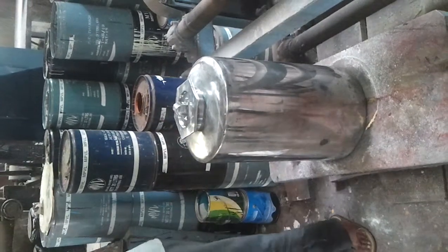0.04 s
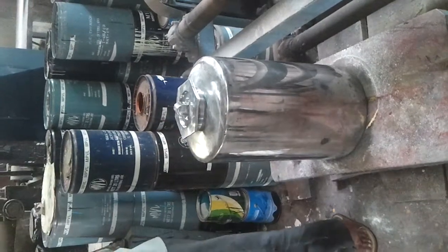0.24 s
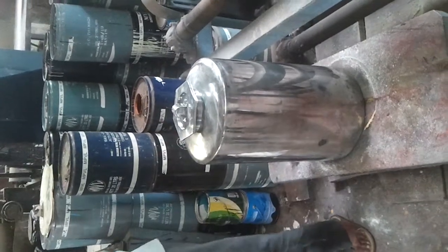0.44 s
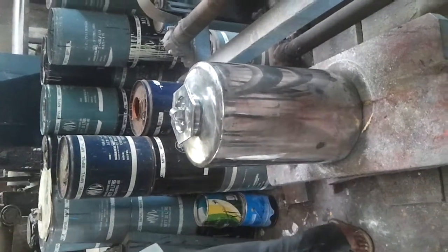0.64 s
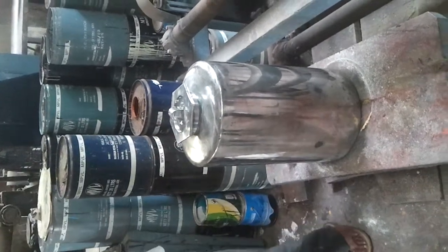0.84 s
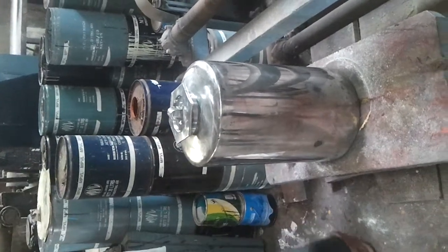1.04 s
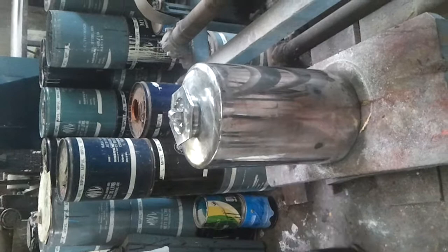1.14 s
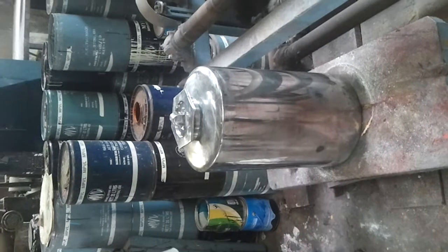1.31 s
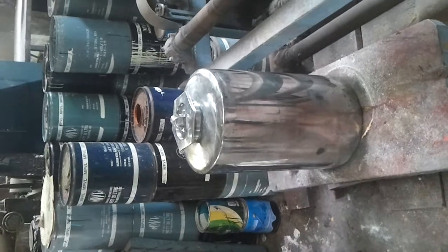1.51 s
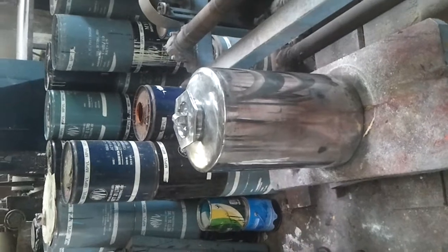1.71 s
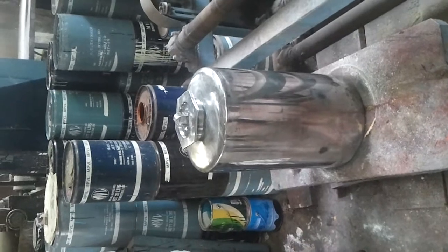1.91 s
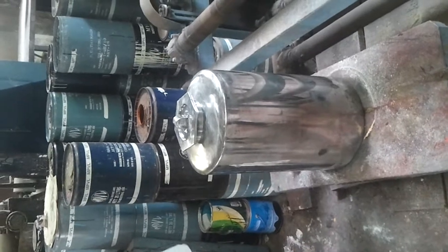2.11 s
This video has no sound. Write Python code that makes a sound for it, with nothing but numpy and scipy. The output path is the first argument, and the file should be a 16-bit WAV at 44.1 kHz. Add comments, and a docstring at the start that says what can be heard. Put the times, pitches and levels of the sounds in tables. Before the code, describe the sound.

A tall steel can is set down with a loud clatter of clangs, high ringing and low booms, slightly overloading a close microphone. The ring fades through a workshop hall, leaving steady hiss, machine hum and soft handling scuffs.

```python
"""A workshop hall, one microphone close to the floor. A tall steel can is set down with a clatter
right beside it: the rim and lid ring high, the thin wall clangs, the base and the air inside boom.
The blows overload the microphone and fill the hall. Behind the can are a steady hiss, a throbbing
machine hum, a fading thud and a few soft scuffs, bumps and ticks of handling."""
import sys
import numpy as np
from scipy import signal
from scipy.fft import rfft, irfft
from scipy.io import wavfile

SR = 44100
rng = np.random.default_rng(int(sys.argv[2]) if len(sys.argv) > 2 else 0)


def file_out(sig):
    """Save sig as 16-bit WAV at sys.argv[1]."""
    # one column per channel
    cols = np.atleast_2d(sig).T
    # limit, then scale
    lim = np.clip(cols, -1, 1)
    pcm = np.round(lim * 32767).astype(np.int16)
    wavfile.write(sys.argv[1], SR, pcm)


N = 94815
T = np.arange(N) / SR

# Reverberation time of the hall: frequency_hz, t60_s
HALL_DECAY = [(80, 1.33), (300, 2.27), (1000, 1.86), (2500, 1.4), (5000, 1.82), (10000, 1.15)]
HALL_RISE_S = 0.14


def undb(db):
    """Decibels to gain."""
    return 10 ** (np.asarray(db) / 20)


def along(points, hz):
    """Read a table on a log-frequency axis."""
    frequencies, values = np.array(points, float).T
    return np.interp(np.log(np.maximum(hz, 1)), np.log(frequencies), values)


def colour(x, spectrum):
    """Filter by a table of frequency_hz, gain_db."""
    return irfft(rfft(x) * undb(along(spectrum, np.fft.rfftfreq(N, 1 / SR))), N)


def noise(spectrum):
    """Coloured noise of rms 1."""
    x = colour(rng.standard_normal(N), spectrum)
    return x / x.std()


def drift(rate_hz):
    """Smooth random motion of spread 1, mostly slower than rate_hz."""
    count = N // 32
    lowpass = np.exp(-(np.fft.rfftfreq(count, T[-1] / count) / rate_hz) ** 2)
    x = irfft(rfft(rng.standard_normal(count)) * lowpass, count)
    return np.interp(T, np.linspace(0, T[-1], count), x / x.std())


def ringing(hits, t60_s, rise_s=0.00031):
    """Envelope of a body that stores the energy of each hit (start_s, level_db) and steadily loses it."""
    kicks = np.zeros(N)
    for start_s, level_db in hits:
        kicks[max(int(start_s * SR), 0)] += undb(level_db) ** 2
    keep = np.exp(-2 * np.log(1000) / (t60_s * SR))
    fill = np.exp(-1 / (rise_s * SR))
    energy = signal.lfilter([keep * (1 - fill)], [1, -keep * (1 + fill), keep ** 2 * fill], kicks + 1e-18)
    return np.sqrt(abs(energy))


def swells(gestures):
    """Envelope of gestures that rise quickly and ebb slowly."""
    envelope = 0
    for start_s, length_s, level_db in gestures:
        progress = np.clip((T - start_s) / length_s, 0, 1)
        envelope += undb(level_db) * np.sin(np.pi * progress ** 0.61) ** 2
    return envelope


def room_tone():
    """The steady hiss of the workshop air."""
    spectrum = [(25, -1.5), (50, 3), (100, -5.5), (200, -11.5), (400, -11), (1000, -14), (2000, -15),
                (4000, -14), (7000, -17), (9500, -12.5), (10800, -19.5), (12500, -38), (15000, -92)]  # colour of the air: frequency_hz, gain_db
    level_db = -29 + 0.14 * drift(4.6)
    return undb(level_db) * noise(spectrum)


def machine_hum():
    """A machine in the background: one low tone that throbs and wavers in pitch."""
    throb = [(0, -26), (.79, -31), (.9, -29.5), (1.22, -33), (1.34, -36.5), (1.42, -28.5), (1.49, -44.5),
             (1.63, -36), (1.71, -29.5), (1.8, -33.5), (1.87, -28.5), (1.98, -32), (2.02, -37), (2.15, -37)]  # course of the hum: time_s, level_db
    level_db = np.interp(T, *np.array(throb).T) + 2.5 * drift(30)
    pitch_hz = 165.5 + 4.88 * drift(20)
    return undb(level_db) * np.sin(2 * np.pi * np.cumsum(pitch_hz) / SR)


def thud():
    """A dull thud at the very start, dying away in the hall."""
    spectrum = [(40, -24), (100, 1.5), (170, -1), (400, 3.5), (600, -4.5), (1000, -10), (2000, -21),
                (6000, -30.5)]  # colour of the thud: frequency_hz, gain_db
    return noise(spectrum) * ringing([(0.0005, -16)], t60_s=1.0)


def handling():
    """Grainy scuffs, low bumps and light ticks, each a shaped burst of noise."""
    scuff_moves = [(.86, 0.38, -35.5), (1.37, 0.3, -32.5), (1.79, 0.25, -36), (1.88, .24, -28),
                   (2.0, 0.25, -32)]  # soft scuffs: start_s, length_s, level_db
    scuff_spectrum = [(500, -21), (2000, -23), (4500, -19), (7000, -13), (9400, -4.5), (11000, -10.5),
                      (14000, -23), (16000, -35)]  # colour of scuffs and ticks: frequency_hz, gain_db
    bump_moves = [(1.65, 0.27, -33), (1.83, .15, -33)]  # low bumps: start_s, length_s, level_db
    bump_spectrum = [(25, -7), (50, 15), (100, 0), (170, 0), (300, -16), (900, -45)]  # colour of the bumps: frequency_hz, gain_db
    tick_hits = [(1.122, -29), (1.256, -20.5)]  # light ticks: start_s, level_db
    scuffs = noise(scuff_spectrum) * undb(1.5 * drift(220)) * swells(scuff_moves)
    bumps = noise(bump_spectrum) * swells(bump_moves)
    ticks = noise(scuff_spectrum) * ringing(tick_hits, t60_s=0.032)
    return scuffs + bumps + ticks


def hall_tail(spectrum, hits):
    """The hall's diffuse answer to the blows, in octave bands; the top octave dies first."""
    source = rfft(noise(spectrum))
    octave = np.log2(np.clip(np.fft.rfftfreq(N, 1 / SR), 100, 12800) / 100)
    tail = 0
    for k in range(8):
        band = irfft(source * np.maximum(1 - abs(octave - k), 0), N)
        tail += band * ringing(hits, along(HALL_DECAY, 100 * 2 ** k), HALL_RISE_S)
    return tail


def struck_modes(pitches, modes, hits, rise_s):
    """Struck modes waver as the can rocks; the hall returns each one with an uneven swell."""
    wander_hz, flutter_db, echo_db = 4.02, 2.2, -13
    sound = 0
    for pitch_hz, (level_db, t60_s) in zip(pitches, modes):
        phase = 2 * np.pi * (np.cumsum(pitch_hz + wander_hz * drift(15.8)) / SR + rng.random())
        direct = undb(flutter_db * drift(26)) * ringing(hits, t60_s, rise_s) * np.sin(phase)
        hall_swell = drift(11.5) * ringing(hits, along(HALL_DECAY, pitch_hz), HALL_RISE_S)
        echo = undb(echo_db) * hall_swell * np.cos(phase)
        sound += undb(level_db) * (direct + echo)
    return sound


def steel_can():
    """Close up, each blow on the floor rings the rim, lid, wall and base; the hall holds the sound."""
    blows = [(0.19, -22, -16.5, -37, -40), (.201, -11, 1, -5.5, -20), (0.211, 1, -10, -25, -21),
             (0.242, -20, -5.5, -4.5, -0.5), (.258, -16, -3, -2.5, -7), (0.283, -21, -1, -0.5, 2),
             (0.338, 4.5, 1.5, -24, -30), (.400, -15, -18, -3, 1.5), (0.431, -20, -5.5, -6, -1.5),
             (0.474, -9.5, -4, -17, -14), (0.511, -29, -29, -9, -8.5), (.925, -47, -32, -27.5, -29),
             (1.135, -55, -42, -33, -40)]  # the can meets the floor: start_s, ring_db, clash_db, clang_db, boom_db
    rim_hz = [8160, 8537, 9098, 10910, 11062, 11184, 11467, 11552]  # high modes of rim and lid: pitch_hz
    rim_modes = [(-16, 1), (-8.5, 0.61), (-9, 0.92), (-12, 0.55), (-2.5, 0.39), (1, 0.5), (-26, 0.52),
                 (-7.5, 0.63)]  # their ring: level_db, t60_s
    lid_hz = [1805, 1885, 2568, 2640, 2918, 3548]  # low modes of the lid: pitch_hz
    lid_modes = [(-10.5, 0.33), (-8.5, 0.36), (-8.5, 0.23), (-13, 0.24), (-18.5, 0.45), (-16, 0.48)]  # their ring: level_db, t60_s
    wall_hz = [258, 329, 393, 581, 754, 904, 948, 1007, 1168, 1400, 1690, 2180, 2503, 3752, 4185, 5010,
               5350]  # modes of the thin wall: pitch_hz
    wall_modes = [(-15, 0.3), (-15, 1.16), (-23, 0.65), (-22, 1.96), (-14.5, 0.88), (-9, 0.61),
                  (-10.5, 0.48), (-18.5, 1.53), (-14.5, 0.98), (-18, 1.14), (-17.5, 0.99), (-23, 0.69),
                  (-18, 0.53), (-17, 0.62), (-23, 0.48), (-32, 0.64), (-25.5, 1.36)]  # their ring: level_db, t60_s
    boom_hz = [86.5, 187]  # modes of the base and the air inside: pitch_hz
    boom_modes = [(-4, 0.29), (-14, 0.71)]  # their ring: level_db, t60_s
    clash_spectrum = [(300, -15), (1500, 6), (2800, 6.5), (4500, 6), (7000, 2.5), (9000, 9.5), (11500, 6.5),
                      (14000, -25), (16000, -33)]  # crowded upper modes of the steel: frequency_hz, gain_db
    clang_spectrum = [(40, -21), (130, 1), (320, 0.5), (480, -1.5), (700, -1.5), (1000, 1.5), (1350, -1.5),
                      (1850, -1.5), (2700, -5.5), (4000, -17), (7000, -19), (15000, -42)]  # crowded modes of the wall: frequency_hz, gain_db
    ring_hits, clash_hits, clang_hits, boom_hits = (np.array(blows)[:, [0, k]] for k in range(1, 5))
    rim = struck_modes(rim_hz, rim_modes, ring_hits, rise_s=0.0023)
    lid = struck_modes(lid_hz, lid_modes, clash_hits, rise_s=0.003)
    wall = struck_modes(wall_hz, wall_modes, clang_hits, rise_s=0.0018)
    boom = struck_modes(boom_hz, boom_modes, boom_hits, rise_s=0.011)
    # The crowded modes of the sheet steel blur into chattering noise.
    chatter = undb(2.3 * drift(140))
    clash = noise(clash_spectrum) * ringing(clash_hits, t60_s=0.3)
    clang = undb(-0.5) * noise(clang_spectrum) * ringing(clang_hits, t60_s=0.44, rise_s=0.0044)
    clash_tail = undb(-13) * hall_tail(clash_spectrum, clash_hits)
    clang_tail = undb(-7.5) * hall_tail(clang_spectrum, clang_hits)
    return rim + lid + wall + boom + chatter * (clash + clang) + clash_tail + clang_tail


def scene():
    """The can and the workshop reach one microphone, the same on both channels."""
    mono = steel_can() + room_tone() + machine_hum() + thud() + handling()
    return np.tile(mono, (2, 1))


def record(dry):
    """The close microphone overloads, flattens the peaks and colours the sound; the top is cut."""
    response = [(20, -2), (9000, -2), (12000, -0.5), (14300, 3), (15000, -17), (16000, -12)]  # colour of the microphone: frequency_hz, gain_db
    overload_level, knee, top_hz = 0.71, 6.0, 15700
    oversampled = signal.resample_poly(dry, 2, 1, axis=1)
    flattened = oversampled / (1.5 + abs(oversampled / overload_level) ** knee) ** (1 / knee)
    heard = colour(signal.resample_poly(flattened, 1, 2, axis=1), response)
    top_cut = signal.ellip(10, 0.05, 60, top_hz, fs=SR, output="sos")
    return signal.sosfiltfilt(top_cut, heard)


dry = scene()
out = record(dry)
file_out(out)
```